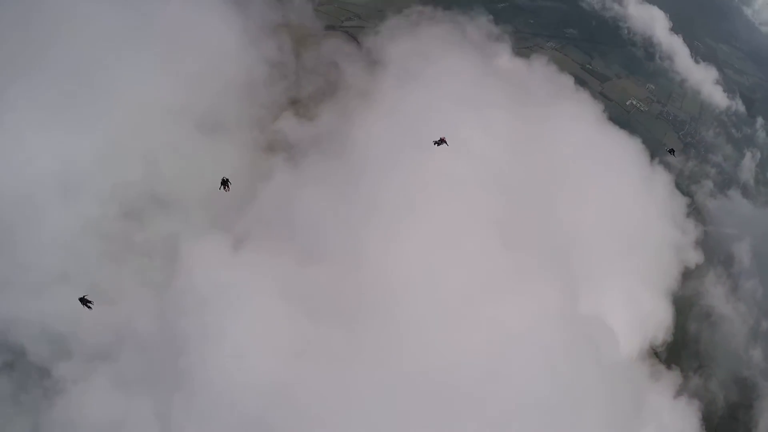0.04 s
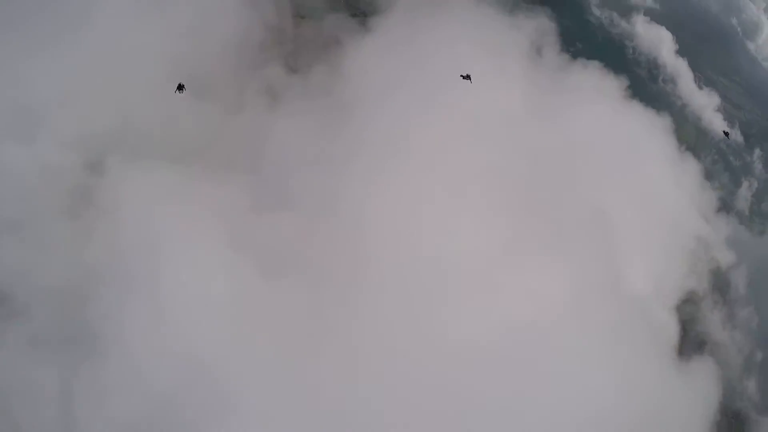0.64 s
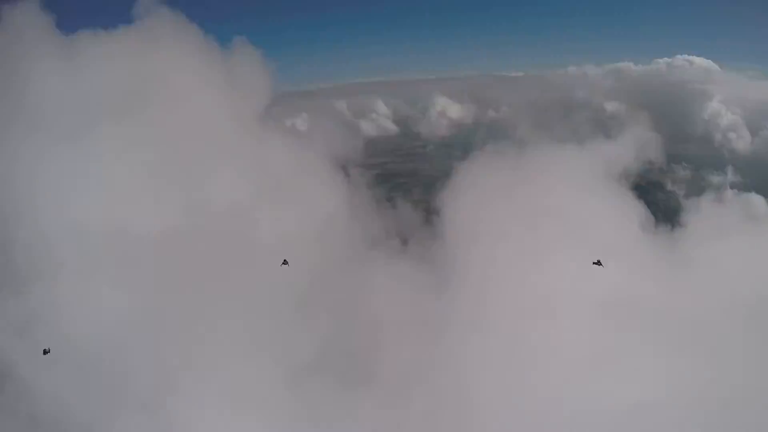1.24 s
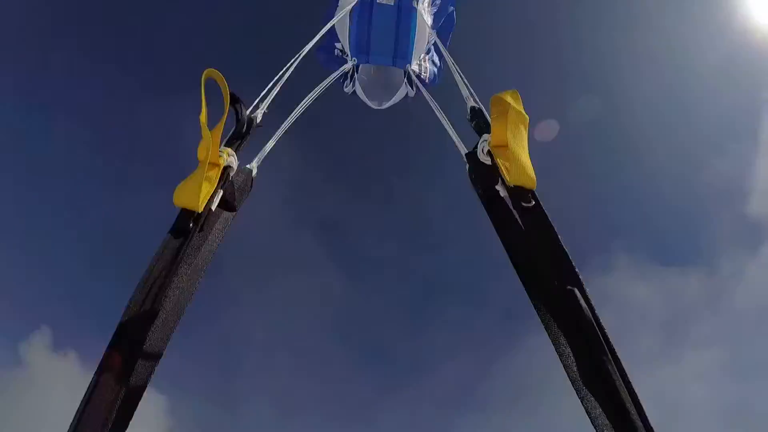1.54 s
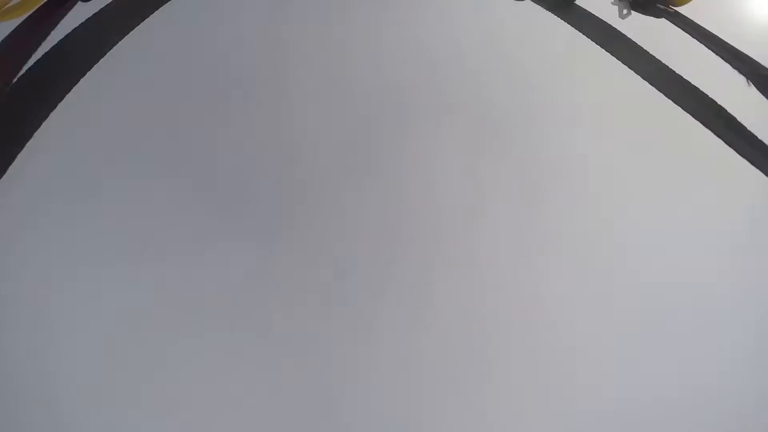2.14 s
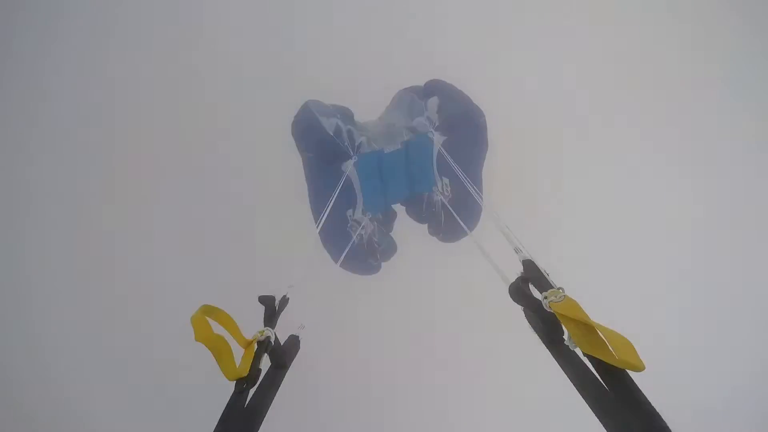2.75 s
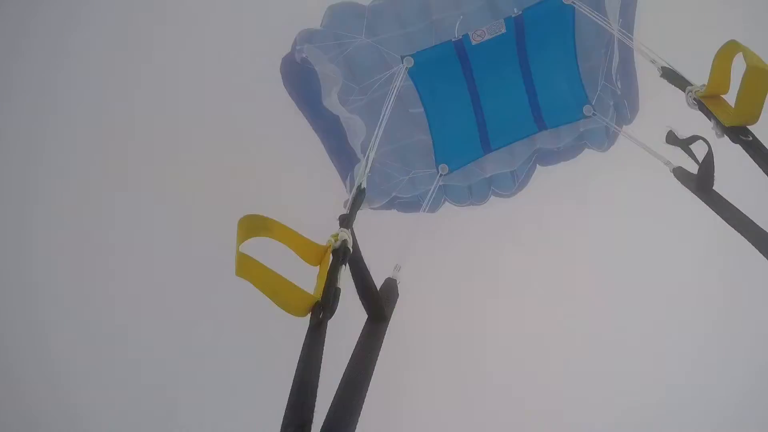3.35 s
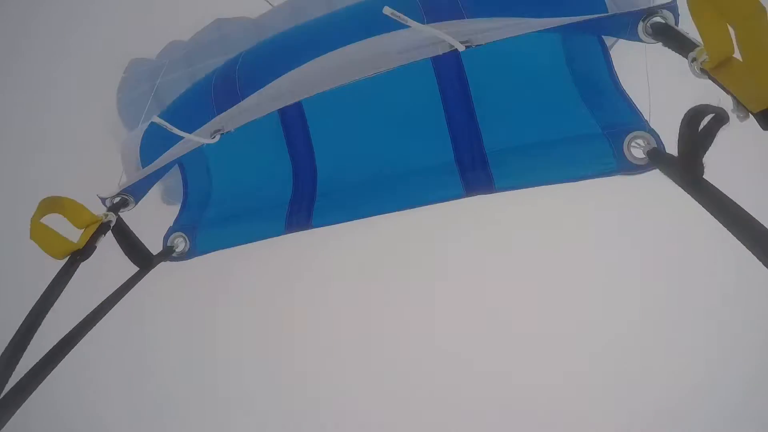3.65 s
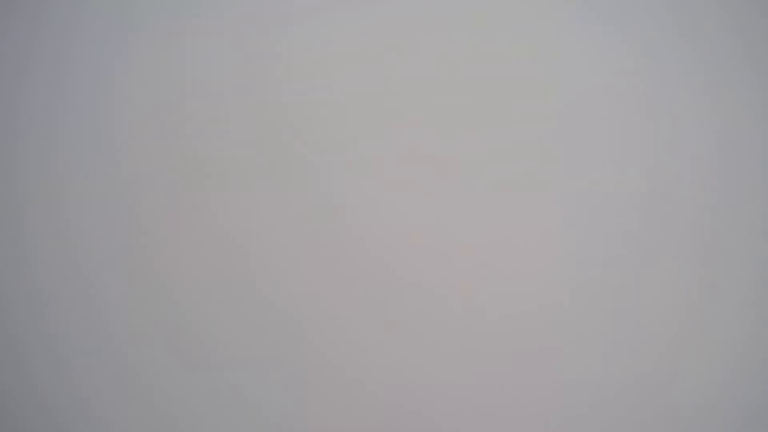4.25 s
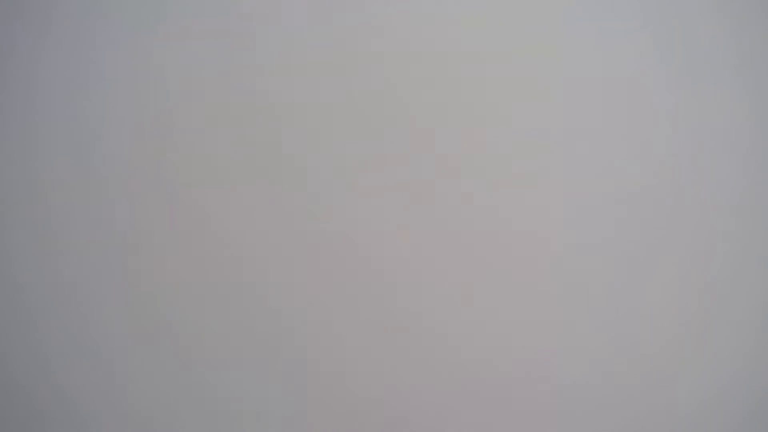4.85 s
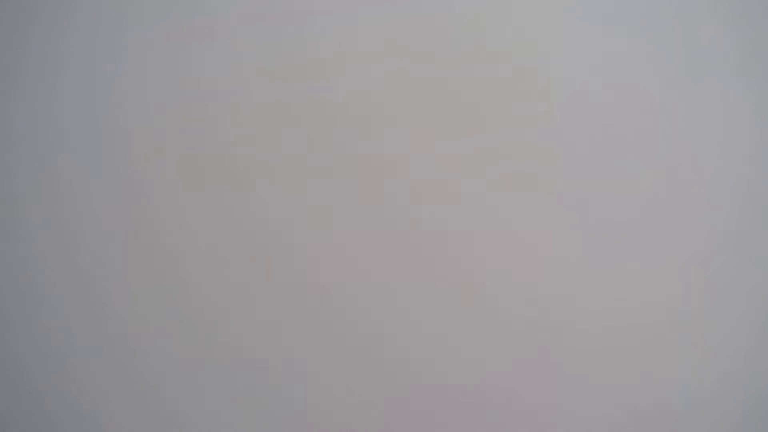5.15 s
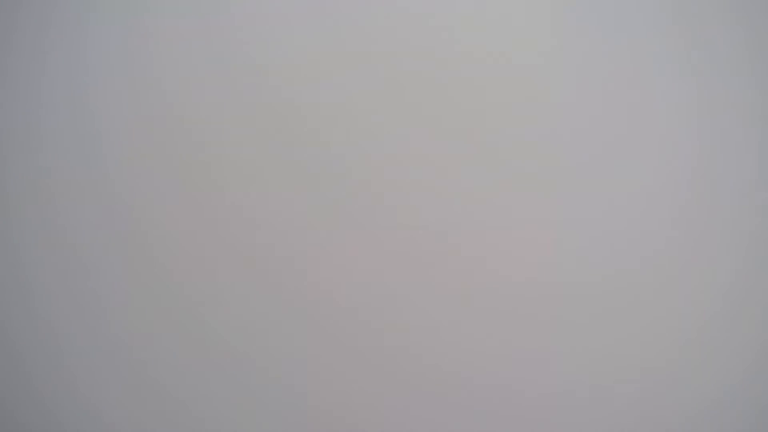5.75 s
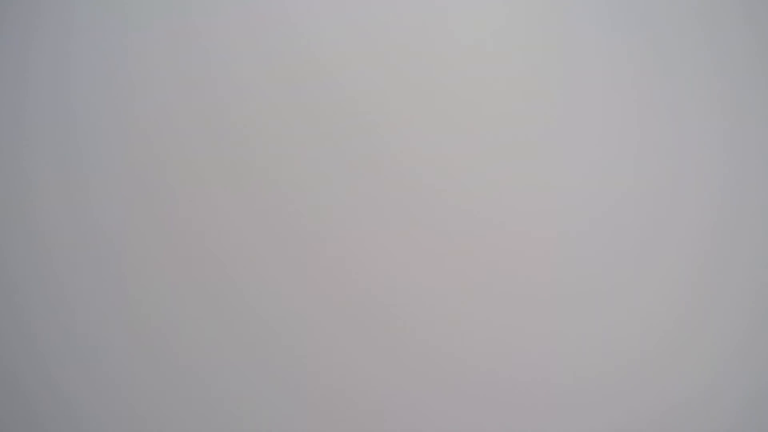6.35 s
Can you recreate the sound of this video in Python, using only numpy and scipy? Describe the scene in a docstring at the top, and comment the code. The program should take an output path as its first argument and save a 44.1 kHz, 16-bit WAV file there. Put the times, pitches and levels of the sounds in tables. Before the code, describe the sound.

Heard from a helmet microphone high in the air, a loud, bright rush of wind is cut short by hard knocks and harness thumps as a parachute deploys. Nylon flutters and snaps amid uneven low gusts, the risers shake, and hardware clacks. After a faint sliding hiss and a few more knocks on the helmet, only softer wind and rumbling buffets remain, with two tiny ticks on the camera housing.

```python
"""A skydiver's helmet camera. Freefall air roars over the housing and eddies buffet the microphone.
Just after a second the parachute is pulled out with two hard jolts: risers snap taut and strike the
helmet, the harness tugs, and the roar drops to a duller, faintly whistling rush. The half-open canopy
rustles, flaps and shudders while fittings clack. Near four seconds the slider hisses down the lines.
The slower wind and its buffeting remain, with two tiny ticks on the housing."""
import sys
import numpy as np
from scipy import signal
from scipy.fft import rfft, irfft, next_fast_len
from scipy.io import wavfile
from scipy.ndimage import map_coordinates

SR = 44100
rng = np.random.default_rng(int(sys.argv[2]) if len(sys.argv) > 2 else 0)


def to_wav(s):
    """Save 16-bit WAV."""
    ch = np.atleast_2d(s).T  # columns
    pcm = np.round(np.clip(ch, -1, 1) * 32767)  # PCM
    wavfile.write(sys.argv[1], SR, pcm.astype(np.int16))


N = 286650
FREEFALL_END_S = 1.485

# airflow over the housing in freefall: time_s, roar_db, hiss_db
FREEFALL_AIR = [(0, -16.5, -29), (.8, -16, -29), (1.2, -16.5, -27), (1.32, -19, -27.5), (1.36, -26.5, -33),
                (1.49, -31.5, -39)]
# airflow once the canopy brakes the fall: time_s, level_db
BRAKED_AIR = [(1.5, -38), (2.35, -46), (2.76, -40), (3.15, -45), (3.58, -39), (4.0, -43), (4.62, -32.5),
              (4.92, -33.5), (5.07, -37.5), (6.5, -41)]


def amp(db):
    """Amplitude ratio of a level in decibels."""
    return 10 ** (np.asarray(db) / 20)


def unit(x):
    """Normalisation to rms 1."""
    return x / np.sqrt(np.mean(x ** 2) + 1e-20)


def along(points, hz):
    """Interpolation of a spectrum on a logarithmic frequency axis."""
    frequencies, levels = np.transpose(points)
    return np.interp(np.log(hz + 1), np.log(frequencies + 1), levels)


def curves(rows):
    """Linear interpolation, one value per sample, of each column after the time."""
    times, *columns = np.transpose(rows)
    return [np.interp(np.arange(N) / SR, times, column) for column in columns]


def gate(start, end, fade):
    """Trapezoidal window: linear fades centred on two times, all in seconds."""
    t = np.arange(N) / SR
    return np.clip(np.minimum(t - start, end - t) / fade + .5, 0, 1)


def wobble(rate):
    """Smooth random modulation: a spline through rate Gaussian values a second."""
    return map_coordinates(rng.standard_normal(int(N * rate / SR) + 4), [np.arange(N) * rate / SR])


def filtered(x, gain_db):
    """Minimum-phase filtering: folding the cepstrum makes the response gain_db(hz) causal."""
    size = 2 * next_fast_len(len(x) // 2 + SR // 20)
    cepstrum = irfft(np.log(amp(gain_db(np.fft.rfftfreq(size, 1 / SR))) + 1e-6))
    cepstrum[1:size // 2] *= 2
    cepstrum[size // 2 + 1:] = 0
    return irfft(rfft(x, size) * np.exp(rfft(cepstrum)))[:len(x)]


def housing(hz):
    """Cavity resonance: the lift in dB that the camera housing gives each frequency."""
    # resonances: centre_hz, width_hz, lift_db
    cavities = [(1213, 250, 6), (1782, 276, 5), (2370, 510, 5), (3596, 150, 3.5), (3920, 330, 2),
                (5480, 120, 5), (6170, 570, 3), (7700, 650, 3.5), (10040, 740, 5.5), (12360, 740, 3)]
    return sum(db * 2 ** -(2 * (hz - centre) / width) ** 2 for centre, width, db in cavities)


def rush(spectrum, flicker_db):
    """Source and filter: flickering turbulent noise, shaped by a spectrum and the housing; rms 1."""
    air = rng.standard_normal(N) * amp(flicker_db)
    return unit(filtered(air, lambda hz: along(spectrum, hz) + housing(hz)))


def airflow():
    """Flow noise grows with airspeed: a bright roar gives way to a dull rush as the fall is braked."""
    # spectra of the freefall roar and hiss: frequency_hz, level_db
    roar_spectrum = [(60, -10), (150, 6.5), (260, -9.5), (600, -10.5), (950, -3.5), (1450, -4.5),
                     (2000, -0.5), (3100, -10.5), (6000, -34)]
    hiss_spectrum = [(300, -8), (4000, 1.5), (6500, -3.5), (8700, -9), (12000, -12), (15000, -28)]
    # spectra of the slower air and its gusts' bright edge: frequency_hz, level_db
    slow_spectrum = [(60, -20), (100, 0), (155, 10.5), (260, -0.5), (380, 2.5), (600, -4.5), (1000, -2.5),
                     (2400, -8.5), (3100, -17), (4500, -22.5), (8700, -33.5), (14500, -50.5)]
    edge_spectrum = [(1200, -17), (2400, 2), (4000, -5), (9000, -33)]
    roar_db, hiss_db = curves(FREEFALL_AIR)
    slow_db = curves(BRAKED_AIR)[0]
    falling = gate(-1, FREEFALL_END_S, fade=.03)
    flicker_db = .5 * wobble(33.4) + wobble(450)
    roar = amp(roar_db + 0.64) * rush(roar_spectrum, flicker_db)
    hiss = amp(hiss_db + 4.5) * rush(hiss_spectrum, flicker_db)
    slow = amp(slow_db + 1.5) * rush(slow_spectrum, flicker_db)
    edge = amp(1.62 * slow_db + 14.5) * rush(edge_spectrum, flicker_db)  # stronger gusts are brighter
    return falling * (roar + hiss) + (1 - falling) * (slow + edge)


def swells(rows):
    """Incoherent addition: the summed power of Gaussian swells, each of a given half-power length."""
    t = np.arange(N) / SR
    return sum(amp(2 * db) * 2 ** -np.minimum((2 * (t - middle_s) / length_s) ** 2, 60)
               for middle_s, length_s, db in rows)


def buffet():
    """Turbulent pressure at the microphone port: large eddies heave, small ones drum in their wake."""
    # steady turbulence, rising as the body tips upright: time_s, level_db
    turbulence = [(0.0, -31), (0.4, -38), (1.14, -24.5), (2.28, -20.5), (3.73, -26.5), (4.6, -27.5),
                  (5.6, -28), (6.5, -26.5)]
    # gusts on the helmet as the canopy opens and settles: middle_s, length_s, level_db
    gusts = [(1.1, 0.079, -11), (1.25, 0.064, -14), (1.71, 0.089, -10.5), (1.94, 0.055, -12.5),
             (2.26, 0.029, -14), (2.51, 0.31, -21), (2.79, 0.028, -9), (3.01, 0.072, -9),
             (3.19, 0.095, -16.5), (3.5, 0.15, -14), (3.7, 0.087, -12), (4.0, 0.14, -15),
             (4.66, 0.44, -21.5)]
    # spectra of the large and small eddies: frequency_hz, level_db
    large_spectrum = [(8, -19.5), (25, 2), (48, -4.5), (70, -26), (400, -88)]
    small_spectrum = [(35, -14), (65, 2.5), (100, -5), (150, -9), (250, -25.5), (1500, -61)]
    steady_db = curves(turbulence)[0]
    roar_db = curves(FREEFALL_AIR)[0]
    gust_power = swells(gusts)
    # small eddies also ride the freefall stream, more strongly once the body tips
    upright_db = 11.5 * gate(0.67, 7, fade=.06)
    stream = amp(roar_db - 16.5 + upright_db) * gate(-1, FREEFALL_END_S, fade=0.01)
    wake = amp(steady_db - 9 + 1.8 * wobble(9))
    large_gain = np.sqrt(amp(steady_db + 2.5) ** 2 + gust_power)
    small_gain = np.sqrt(wake ** 2 + amp(-13.5) ** 2 * gust_power + stream ** 2)
    swirl = signal.hilbert(rush(large_spectrum, 0))
    heave = unit(swirl.real / (np.abs(swirl) + 0.33) ** 0.25)  # evens out the large eddies' strength
    drumming = rush(small_spectrum, 2.26 * wobble(30) + 4.8 * heave)
    return large_gain * heave + small_gain * drumming


def canopy():
    """Flow-induced flutter: slack nylon rustles steadily and in bursts, with sparse small cracks."""
    # folds of cloth catching the air: middle_s, length_s, level_db
    flutters = [(1.63, 0.16, -46), (1.93, 0.11, -49.5), (2.07, 0.13, -48), (2.68, 0.034, -52),
                (2.82, 0.033, -46), (2.98, 0.11, -47.5), (3.18, 0.15, -50.5), (3.258, 0.046, -44.5),
                (3.39, 0.091, -47.5), (3.585, 0.13, -43), (3.76, 0.083, -56.5), (3.85, 0.021, -55),
                (4.06, 0.16, -53.5)]
    # spectra of the nylon's rustle and crackle: frequency_hz, level_db
    rustle_spectrum = [(400, -13), (1100, 0), (1500, -2.5), (2100, -1.5), (2950, 3), (4300, -7.5),
                       (5500, -7.5), (6250, -6.5), (7000, -11.5), (8700, -17.5), (12500, -26), (15000, -35)]
    crackle_spectrum = [(500, 2), (1100, -7), (1800, 4), (3000, 4), (4500, -11), (9000, -30)]
    slack = gate(1.1, 2.9, fade=0.06)
    steady = amp(-13 + 1.034 * curves(BRAKED_AIR)[0]) * slack  # follows the airflow
    motion = np.sqrt(steady ** 2 + swells(flutters))
    rustle = amp(12.5) * motion * rush(rustle_spectrum, 2.46 * wobble(55) + 2.0 * wobble(600))
    crackle = amp(-17.0) * np.sqrt(motion) * rush(crackle_spectrum, 8.1 * wobble(300))
    return rustle + crackle


def ring(modes, low_db, upper_db):
    """Modal response: damped sinusoids convolved with a short, rough contact force; peak 1."""
    t = np.arange(SR // 16) / SR
    body = np.zeros(len(t))
    for hz, db, t60 in modes:
        strength_db = db + low_db * (hz < 800) + upper_db * (hz > 3000) + rng.normal(0, 1.0)
        body += amp(strength_db - 60 * t / t60) * np.sin(2 * np.pi * hz * rng.normal(1, .02) * t)
    contact = .06 * rng.standard_normal(len(t)) * np.exp(-t / .003)
    contact[0] += 1  # the first touch
    struck = signal.fftconvolve(body, contact)[:len(t)] * (1 - np.exp(-t / .001))
    cutoff_hz = 0.91 * modes[-1][0]  # just under the top mode
    struck = filtered(struck, lambda hz: -10 * np.log10(1 + (hz / cutoff_hz) ** 20))
    return struck / np.abs(struck).max()


def thump(pitch_hz, t60, attack_s):
    """Damped mass and spring: the helmet rocks briefly on its padding; peak 1."""
    t = np.arange(SR // 8) / SR
    rock = np.sin(2 * np.pi * pitch_hz * t) * amp(-60 * t / t60) * (1 - np.exp(-t / attack_s))
    return rock / np.abs(rock).max()


def knocks():
    """Impact excitation: a riser rings the shell, coloured by where it strikes, then rocks the helmet."""
    # riser strikes: start_s, ring_db, thump_db, low_lift_db, upper_lift_db
    strikes = [(1.335, -8, -10, -11, -5), (1.3409, 4.5, 0, -3.5, -0.5), (1.424, -3, -3.5, 3.5, 16.5),
               (1.7105, -7, -17, -1, -3), (2.517, -19, -14.5, 3, 1), (3.952, -17.5, -10.5, -4, 1.5),
               (3.997, -7.5, -15, -3.5, -0.5), (4.061, -12.5, -26, 0, 6), (4.07, -17, -14, 2, 7),
               (4.485, -7, -14, 5, 2), (4.628, -25, -12, 6, 12)]
    # modes of the helmet shell: pitch_hz, level_db, t60_s
    shell_modes = [(382, -4.5, 0.014), (593, -5, 0.012), (1136, -1.5, 0.0094), (1886, 2.5, 0.005),
                   (2340, 3, 0.0056), (3610, -3.5, 0.0056), (4850, -3, 0.0066)]
    track = np.zeros(N)
    for start_s, ring_db, thump_db, low_db, upper_db in strikes:
        add(track, start_s, amp(ring_db) * ring(shell_modes, low_db, upper_db))
        add(track, start_s + 0.005, amp(thump_db) * thump(pitch_hz=131, t60=0.052, attack_s=0.0024))
    return track


def add(track, start_s, sound):
    """Superposition of a short sound on the track."""
    start = max(round(start_s * SR), 0)
    track[start:start + len(sound)] += sound[:max(N - start, 0)]


def crack(tone_db, rise_s, tail_db, tail_t60):
    """Broadband transient: a noise burst with a faint tail, filtered by the housing; peak 1."""
    t = np.arange(SR // 8) / SR
    envelope = t / rise_s * np.exp(1 - t / rise_s) + amp(tail_db - 60 * t / tail_t60)
    burst = filtered(envelope * rng.standard_normal(len(t)), lambda hz: tone_db(hz) + housing(hz))
    return burst / np.abs(burst).max()


def tugs():
    """Impulsive loading: the harness jerks the helmet, giving a thump and a dull puff."""
    # harness jerks: start_s, level_db, pitch_hz
    jerks = [(1.361, -14, 119), (1.4125, -8, 148), (1.463, -10.5, 111), (2.129, -20, 145),
             (2.221, -20, 138), (2.99, -23, 129), (3.056, -27, 128), (3.353, -16.5, 125), (3.383, -13, 109),
             (4.165, -21.5, 166)]
    track = np.zeros(N)
    dull = lambda hz: -20 * np.log10(1 + (hz / 380) ** 2)
    for start_s, db, pitch_hz in jerks:
        add(track, start_s, amp(db - 0.5) * thump(pitch_hz, t60=0.058, attack_s=0.0067))
        add(track, start_s, amp(db - 7) * crack(dull, rise_s=0.0023, tail_db=-15, tail_t60=.04))
    return track


def whistles():
    """Edge tones: breathy whistles at the housing drift in pitch and swell with the slower airflow."""
    # whistles, with levels relative to the airflow: pitch_hz, level_db
    edge_tones = [(1235, -13), (2290, -14), (3520, -20)]
    width_hz = 150  # random modulation spreads each tone into a narrow band
    t = np.arange(N) / SR
    drift = 1 + .025 * wobble(7)
    track = np.zeros(N)
    for hz, db in edge_tones:
        phase = 2 * np.pi * np.cumsum(hz * drift) / SR
        tone = wobble(width_hz) * np.sin(phase) + wobble(width_hz) * np.cos(phase)
        track += amp(db + 3.1 * wobble(7.6)) * unit(tone)
    return track * amp(curves(BRAKED_AIR)[0]) * (t > FREEFALL_END_S)


def clacks():
    """Free vibration: fittings collide and ring as the load shifts, each with a dull slap of webbing."""
    # collisions: start_s, level_db
    collisions = [(1.518, -16.5), (2.269, -20.5), (3.657, -14), (3.707, -16.5), (3.735, -12), (3.776, -14)]
    # modes of the harness hardware: pitch_hz, level_db, t60_s
    hardware_modes = [(193, 3, 0.025), (342, -8, 0.023), (1130, -4, 0.0052), (1940, 3.5, 0.0076),
                      (3650, -6, 0.0024), (7000, -5, 0.0067)]
    track = np.zeros(N)
    webbing = lambda hz: -20 * np.log10(1 + (hz / 2400) ** 4)
    for start_s, db in collisions:
        add(track, start_s, amp(db + 4.0) * ring(hardware_modes, low_db=0, upper_db=0))
        add(track, start_s, amp(db - 6) * crack(webbing, rise_s=0.0015, tail_db=-9, tail_t60=0.044))
    return track


def flaps():
    """Whip action: loose cloth and lines snap in the wind, each a soft-edged burst of band-pass noise."""
    # snaps: start_s, level_db, centre_hz
    snaps = [(1.571, -21, 1660), (1.648, -14.5, 1470), (1.8261, -15.5, 1720), (1.9, -19, 1880),
             (1.953, -20, 2400), (2.639, -20, 1550), (2.712, -19, 1790), (2.752, -14.5, 1823),
             (2.784, -11.5, 1110), (2.816, -22, 1750), (2.861, -17.5, 1780), (3.2422, -19, 2930),
             (3.258, -23.5, 675), (3.479, -11, 1630)]
    track = np.zeros(N)
    for start_s, db, centre_hz in snaps:
        band = lambda hz: (-19 * np.log10(1 + (hz / centre_hz / 1.21) ** 4)
                           - 8 * np.log10(1 + (1.03 * centre_hz / (hz + 1)) ** 4))
        snap = crack(band, rise_s=0.002, tail_db=-24, tail_t60=0.03)
        add(track, start_s - .0005, amp(db + 1.7) * snap)
    return track


def shudder():
    """Growing oscillation: the half-open canopy shakes the risers ever harder until it spreads."""
    start_s, end_s, growth_db_per_s = 2.13, 2.81, 18.5
    t = np.arange(N) / SR
    pitch_hz = 63.8 * (1 + .12 * wobble(35))
    level_db = -18 - growth_db_per_s * np.abs(end_s - t) + 3.0 * wobble(22)
    shake = unit(np.sin(2 * np.pi * np.cumsum(pitch_hz) / SR))
    return amp(level_db) * gate(start_s, end_s, fade=.05) * shake


def slider():
    """Sliding friction: the slider runs down the lines with a narrow-band hiss."""
    # bands of hiss: start_s, end_s, centre_hz, width_hz, level_db
    hiss_bands = [(3.94, 4.09, 5950, 800, -49), (3.94, 4.49, 9950, 750, -62)]
    track = np.zeros(N)
    for start_s, end_s, centre_hz, width_hz, db in hiss_bands:
        band = lambda hz: -20 * np.log10(1 + (2 * (hz - centre_hz) / width_hz) ** 2)
        envelope = amp(db + 1.2 * wobble(29.2)) * gate(start_s, end_s, fade=0.045)
        track += envelope * unit(filtered(rng.standard_normal(N), band))
    return track


def ticks():
    """Brief contact gives a bright spectrum: something tiny, perhaps a droplet, hits the housing."""
    # tiny impacts: start_s, level_db
    impacts = [(5.1733, -42), (6.153, -34)]
    # spectrum of a tick: frequency_hz, level_db
    tick_spectrum = [(3000, -30), (7100, 4), (9500, -12), (14000, -4)]
    track = np.zeros(N)
    for start_s, db in impacts:
        tick = crack(lambda hz: along(tick_spectrum, hz), rise_s=0.00054, tail_db=-20, tail_t60=.03)
        add(track, start_s, amp(db + 3.0) * tick)
    return track


def scene():
    """Superposition: all the sources add at one microphone on the helmet."""
    wind = airflow() + whistles() + buffet()
    parachute = canopy() + shudder() + flaps() + slider()
    return (wind + parachute + knocks() + clacks() + tugs() + ticks())[None]


def record(dry):
    """Saturation and band limiting: the camera rounds off the hardest peaks and cuts the top treble."""
    ceiling, top_hz = .95, 15400
    clipped = dry / (1 + np.abs(dry / ceiling) ** 8) ** (1 / 8)
    size = next_fast_len(N + SR // 2)
    passband = np.fft.rfftfreq(size, 1 / SR) < top_hz
    return irfft(rfft(clipped, size) * passband, size)[:, :N]


dry = scene()
out = record(dry)
to_wav(out)
```